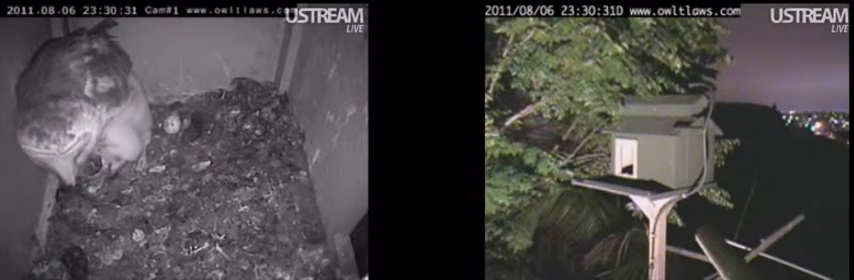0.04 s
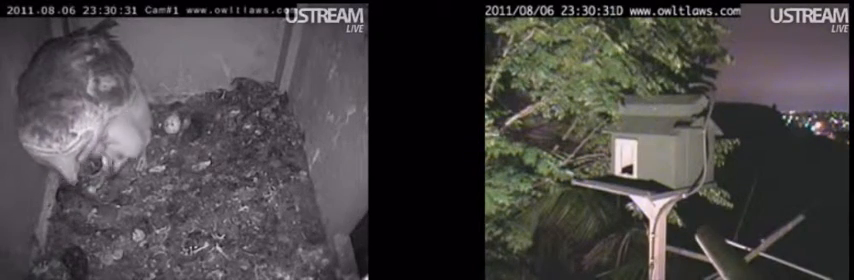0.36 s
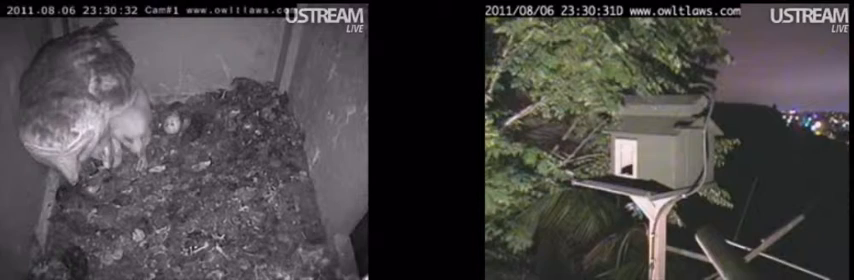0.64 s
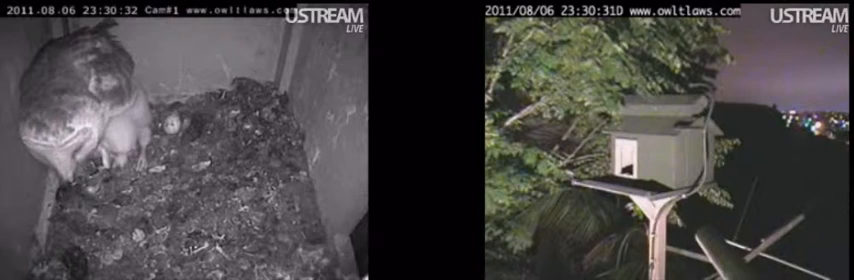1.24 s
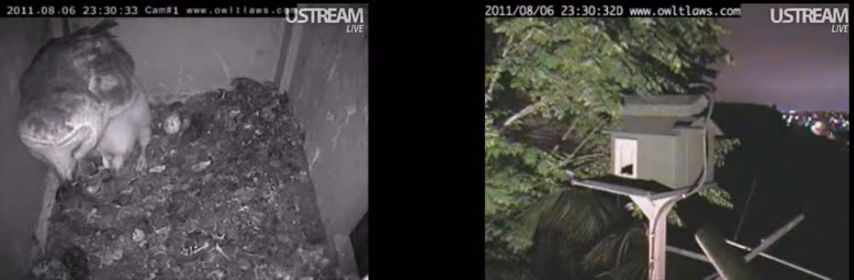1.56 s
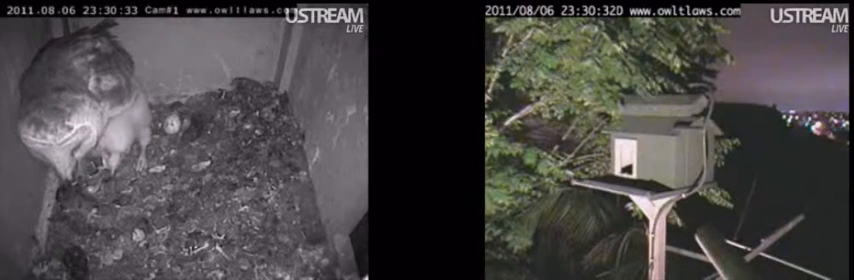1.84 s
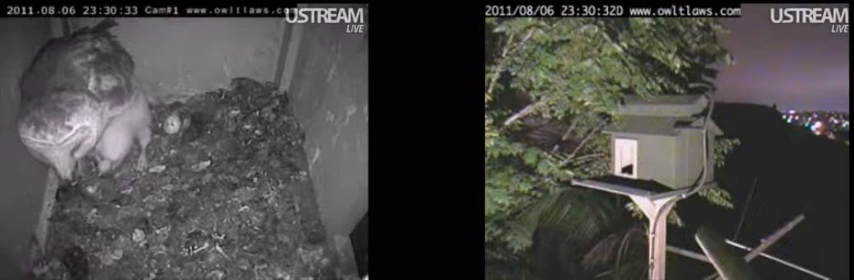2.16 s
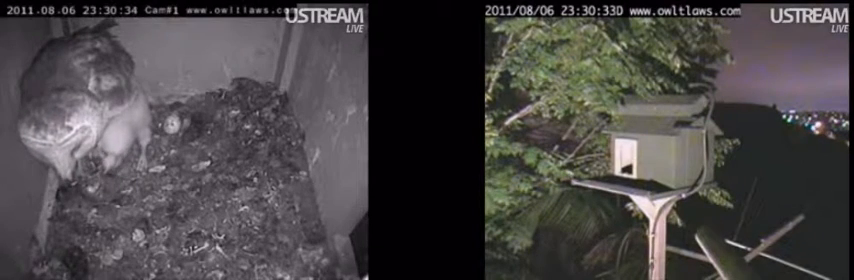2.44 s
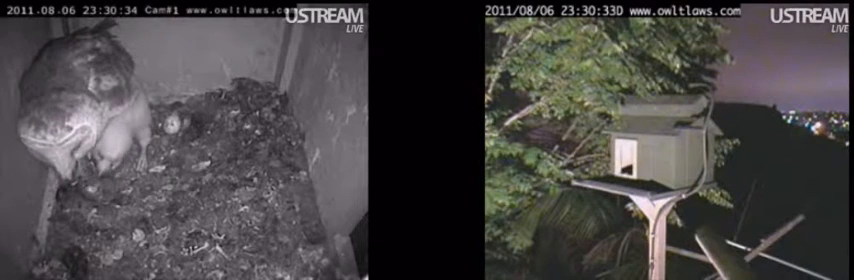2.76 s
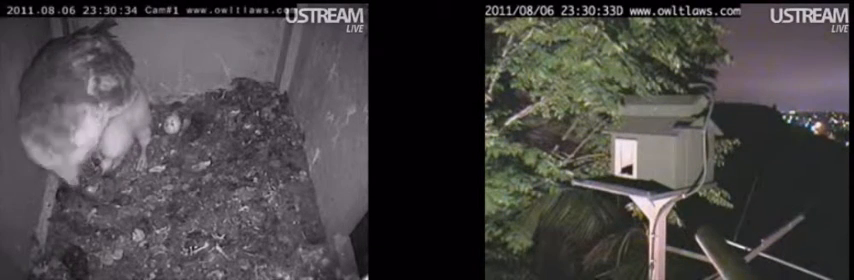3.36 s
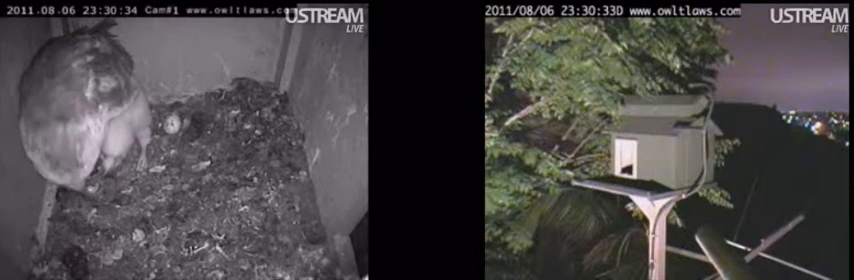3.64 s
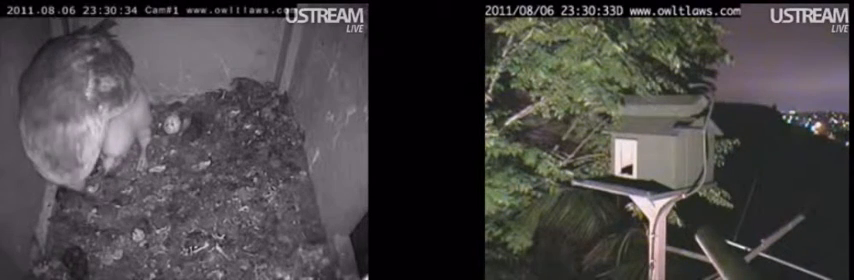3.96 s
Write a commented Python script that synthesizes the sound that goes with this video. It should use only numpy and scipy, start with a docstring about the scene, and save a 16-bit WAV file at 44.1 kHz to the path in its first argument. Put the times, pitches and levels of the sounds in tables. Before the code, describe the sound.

Close to the microphone in a hollow wooden nest box, an owlet makes three short, raspy hissing calls with pauses between. Feathers rustle faintly and a bill or claw ticks, while a distant engine-like hum and rumble continue.

```python
"""Inside a wooden nest box, close to a small camera microphone: a young barn owl begs three times.
Each call is a rush of air that stirs the box, topped by a fluttering rasp near 2.8 kHz that swells,
breaks into a thin whistle and stops short. Nearby, feathers rustle and a bill or claw ticks.
From outside come a low hum like a distant engine and a rumble, with night noise coloured by the box.
The microphone adds a faint hiss and whine. Now and then a faint treble hiss swells briefly."""
import sys
import numpy as np
from scipy import signal
from scipy.fft import rfft, irfft
from scipy.io import wavfile

SR = 44100
rng = np.random.default_rng(int(sys.argv[2]) if len(sys.argv) > 2 else 0)


def pcm_store(signal):
    """Save signal as 16-bit PCM."""
    levels = np.round(np.clip(np.atleast_2d(signal), -1, 1) * 32767)
    wavfile.write(sys.argv[1], SR, levels.astype(np.int16).T)


N = 176400
T = np.arange(N) / SR

# Soft treble of the feathers and the hiss swells. Each row: frequency in Hz, relative level in dB.
TREBLE_SPECTRUM = [(2000, -4.5), (3500, 1), (5500, -2.5), (7500, -5), (8800, -9), (9600, -18.5)]
# Patches of grainy treble. Each row: start and end in seconds, level in dB.
TREBLE_PATCHES = [(-.1, .68, -69), (.01, 0.11, -79), (0.716, 0.928, -74.5), (1.402, 1.48, -77.5),
                  (3.448, 3.57, -73.5), (3.594, 3.71, -72.5), (3.727, 3.799, -69.5), (3.775, 3.905, -74),
                  (3.891, 4.02, -74)]
HISS_PATCH = TREBLE_PATCHES[2]  # here a faint treble hiss swells briefly; the other rows are feathers


def owl():
    """Close up: rushing air stirs the box, puffs of turbulence ring the throat, a whistle breaks in."""
    # One list a call. Each row: time in seconds, rasp, air and whistle levels in dB, whistle in Hz.
    begs = [
        [(.275, -74, -51, -84, 2800), (.295, -51.5, -51, -61, 2720), (.32, -49.5, -48.5, -58, 2920),
         (.35, -61, -52, -66, 2900), (.395, -60, -47.5, -60, 2700), (.425, -60, -45, -68, 2800),
         (.485, -52.5, -47.5, -56, 2750), (.545, -44.5, -50, -56, 2950), (.583, -47, -45, -43, 2800),
         (.596, -40, -59, -54, 2790), (.627, -41.5, -41, -54, 2950), (.639, -47, -45, -42, 2950),
         (.647, -54, -69, -65, 2820), (.662, -62, -69, -56, 2820), (.672, -67, -64, -67, 2780)],
        [(1.821, -72, -59, -74, 2950), (1.831, -67, -48.5, -63.5, 2900), (1.87, -61, -51, -75, 2700),
         (1.95, -53.5, -44, -69.5, 2760), (1.99, -48.5, -46, -53.5, 2920), (2.01, -56.5, -50, -65.5, 2800),
         (2.033, -48.5, -45, -59, 2680), (2.057, -44, -44, -48.5, 2670), (2.075, -48.5, -46, -47, 2680),
         (2.092, -48.5, -56, -61, 2820), (2.109, -39, -47, -47.5, 2700), (2.128, -44, -50, -53, 2720),
         (2.146, -45.5, -47, -58, 3000), (2.172, -52, -48, -50, 2860), (2.186, -53, -52.5, -61, 2910),
         (2.199, -60, -71, -57.5, 3030), (2.208, -71, -71, -69, 3080)],
        [(2.975, -75, -57, -74, 2780), (3.005, -61.5, -47.5, -58, 2820), (3.035, -58.5, -50, -54, 2840),
         (3.08, -53.5, -48.5, -53.5, 2850), (3.115, -54, -55, -53, 2740), (3.135, -54, -50, -52, 2860),
         (3.155, -52, -49, -69, 2820), (3.175, -55, -48, -61, 2800), (3.19, -51, -47.5, -47.5, 2770),
         (3.215, -50, -49, -52, 2690), (3.26, -51, -46, -54, 2670), (3.283, -53, -46.5, -53, 2850),
         (3.31, -55.5, -63, -55, 2750), (3.337, -60, -49, -67, 2930), (3.35, -72, -82, -75, 2900)],
    ]
    # Resonances of the throat. Each row: frequency in Hz, relative level in dB.
    throat_spectrum = [(1000, -20.5), (1600, -17.5), (2000, -12), (2350, -6), (2530, 2), (2700, 1),
                       (2970, 0), (3140, -12.5), (3500, -16), (3750, -26), (4050, -38), (4600, -56.5),
                       (9000, -64)]
    # The breath as the box colours it. Each row: frequency in Hz, relative level in dB.
    air_spectrum = [(150, -26.5), (300, -3.5), (480, -10), (620, -5.5), (770, 7.5), (930, 0), (1110, -22.5),
                    (1220, -11), (1500, -21.5), (2100, -16), (3000, -46.5), (4000, -53), (9000, -70)]
    rows = np.concatenate(begs)
    rasp_db, air_db, whistle_db, whistle_hz = (curve(rows[:, [0, k]]) for k in range(1, 5))
    fade_s = .016
    calling = sum(stretch(beg[0][0] - fade_s / 2, beg[-1][0] + fade_s / 2, fade_s) for beg in begs)
    puffs = flutter()
    throat = colour(puffs * noise(), throat_spectrum)
    breathy_ring = amp(-7.5) * resonate(puffs * noise(), whistle_hz, width_hz=180)
    rasp = amp(rasp_db) * unit(throat + breathy_ring)
    air = amp(air_db) * colour(noise(), air_spectrum)
    call = rasp + air + amp(whistle_db) * whistle(whistle_hz)
    return calling * call + bill_closings()


def flutter():
    """Uneven puffs of the syrinx, each with its own strength; rms 1."""
    rate_hz, jitter, depth, spread_db = 154.6, .3, .42, 1.8
    turns = np.cumsum(rate_hz * np.exp(jitter * wander(88.6))) / SR
    strength = amp(spread_db * np.clip(noise(), -2, 2))[turns.astype(int)]
    return unit(1 - depth + 2 * depth * strength * np.sin(np.pi * turns) ** 4)


def whistle(hz):
    """A thin, unsteady tone of air through the syrinx; rms 1."""
    jitter_hz, shimmer_db = 50, 2.5
    turns = np.cumsum(hz + jitter_hz * wander(140)) / SR
    return unit(np.sin(2 * np.pi * turns) * amp(shimmer_db * wander(120)))


def bill_closings():
    """As the bill closes on each call, air rings a lower, sliding resonance of the mouth."""
    # Each row: centre and half-length in seconds, level in dB, pitch in Hz, slide in Hz per second.
    closings = [(0.645, 0.02, -51.5, 2240, -20000), (2.157, .013, -52.5, 2020, 16000),
                (3.33, 0.02, -62, 1690, -15000)]
    out = np.zeros(N)
    for centre, half_length, db, hz, slide in closings:
        glide_hz = hz + slide * np.clip(T - centre, -2 * half_length, 2 * half_length)
        out += amp(db) * swell(centre, half_length) * resonate(noise(), glide_hz, width_hz=360)
    return out


def ticks():
    """Tiny dry clicks of bill or claw in the nest, each a fast-dying burst of noise."""
    # Each row: start in seconds, peak level in dB.
    clicks = [(0.349, -48), (0.535, -44), (.638, -58), (1.42, -46.5)]
    # Colour of a click. Each row: frequency in Hz, relative level in dB.
    click_spectrum = [(600, -16), (1300, 5), (1950, 5.5), (2400, -5.5), (3000, -9), (4600, -9.5),
                      (5500, -33), (9500, -49)]
    t60_s = .013
    t = np.arange(2048) / SR - .005
    decay = (t > 0) * 1000 ** (-abs(t) / t60_s)
    out = np.zeros(N)
    for start, db in clicks:
        tick = colour(rng.standard_normal(len(t)) * decay, click_spectrum)
        out += amp(db) * np.interp(T - start, t, tick / abs(tick).max(), 0, 0)
    return out


def feathers():
    """Feathers rustle and scuff as the owls shift."""
    return grainy_treble([row for row in TREBLE_PATCHES if row != HISS_PATCH])


def distant_hum():
    """Far outside the box, one low wavering tone like an engine."""
    # Course of the pitch. Each row: time in seconds, frequency in Hz.
    pitches = [(0, 71.54), (.85, 77.43), (1.1, 73.12), (3.3, 72.5), (4, 78.87)]
    # Swells and dips. Each row: time in seconds, level in dB before the trim.
    levels = [(0.0, -67), (0.04, -34), (0.37, -37.5), (0.39, -43), (0.43, -37.5), (0.83, -43),
              (0.91, -29.5), (1.19, -24), (1.32, -41.5), (1.36, -28), (1.67, -30), (1.71, -56), (1.77, -30),
              (2.57, -29.5), (2.62, -43), (2.68, -31), (2.8, -37), (2.85, -26.5), (3.02, -34.5),
              (3.05, -38), (3.16, -31.5), (3.29, -38.5), (3.44, -25.5), (3.5, -67), (3.55, -32),
              (3.64, -39.5), (3.75, -32), (3.83, -47), (3.85, -31.5), (4.0, -41)]
    pitch_drift, trim_db, waver_db = .0096, -2.5, 1
    hz = curve(pitches) * (1 + pitch_drift * wander(5.3))
    tone = unit(np.sin(2 * np.pi * np.cumsum(hz) / SR))
    return tone * amp(curve(levels) + trim_db + waver_db * wander(23))


def outdoor_rumble():
    """Deep noise from outdoors, slowly easing off."""
    # Each row: time in seconds, level in dB.
    levels = [(0, -35), (.8, -37), (1.1, -35.5), (2, -38), (3, -40), (4, -41.5)]
    # Its colour. Each row: frequency in Hz, relative level in dB.
    spectrum = [(8, -27.5), (25, -13.5), (40, -4.5), (58, -4), (68, 1), (80, -1.5), (92, -4.5), (108, -15),
                (135, -31), (200, -29.5)]
    return amp(curve(levels)) * colour(noise(), spectrum)


def hollow_box():
    """Night noise from outside rings in the hollow box around the microphone."""
    # Resonances of the box. Each row: frequency in Hz, relative level in dB.
    spectrum = [(70, -23), (120, -1.5), (190, -6), (240, -1.5), (280, 3.5), (350, -3.5), (430, -13.5),
                (540, -15), (680, -11.5), (760, -3.5), (812, 3), (865, -9), (920, -2), (1020, -11),
                (1130, -20), (1500, -23.5), (2200, -27.5), (2750, -22.5), (3100, -28), (3700, -41),
                (5000, -64)]
    level_db, waver_db = -49, .5
    return amp(level_db + waver_db * wander(5.7)) * colour(noise(), spectrum)


def microphone_noise():
    """The microphone's own steady hiss and thin electrical whine."""
    # Each row: frequency in Hz, level in dB.
    whine_tones = [(7927, -90), (8072, -93)]
    # Each row: frequency in Hz, relative level in dB.
    hiss_spectrum = [(1500, 10), (3500, 21), (5000, -9), (7500, -13), (8700, -15), (9600, -23.5)]
    whine = sum(amp(db) * resonate(noise(), hz, width_hz=12) for hz, db in whine_tones)
    return whine + amp(-81) * colour(noise(), hiss_spectrum)


def hiss_swells():
    """Now and then a faint treble hiss swells briefly."""
    # Each row: centre and half-length in seconds, level in dB.
    swells = [(1.297, 0.034, -75), (1.723, 0.043, -74.5), (2.002, 0.028, -75.5), (2.57, 0.069, -79),
              (2.759, .06, -72.5), (3.065, 0.034, -71.5), (3.28, 0.054, -72)]
    level = sum(amp(db) * swell(centre, half_length) for centre, half_length, db in swells)
    return level * colour(noise(), TREBLE_SPECTRUM) + grainy_treble([HISS_PATCH])


def grainy_treble(patches):
    """Patches of soft treble noise with sparse crackles in it."""
    crackles_per_s, waver_db = 540, 1
    level = sum(amp(db) * stretch(start, end, fade_s=.022) for start, end, db in patches)
    crackles = unit(noise() * (rng.random(N) < crackles_per_s / SR))
    return level * amp(waver_db * wander(15)) * colour(noise() + amp(-7) * crackles, TREBLE_SPECTRUM)


def amp(db):
    """Decibels to gain."""
    return 10 ** (np.asarray(db) / 20)


def unit(x):
    """Scales to rms 1."""
    return x / np.sqrt(np.mean(x ** 2) + 1e-20)


def noise():
    """White noise."""
    return rng.standard_normal(N)


def wander(rate_hz):
    """Random drift up to about the given rate; rms 1."""
    hz = np.fft.rfftfreq(N, 1 / SR)
    return unit(irfft(rfft(noise()) / (1 + (hz / rate_hz) ** 4), N))


def curve(points):
    """Joins (seconds, value) points by straight lines."""
    return np.interp(T, *np.transpose(points))


def swell(centre, half_length):
    """A bell-shaped rise and fall around a moment."""
    return np.exp(-((T - centre) / half_length) ** 2)


def stretch(start, end, fade_s):
    """Fades in after start and out before end."""
    return np.clip(np.minimum(T - start, end - T) / fade_s, 0, 1)


def colour(x, spectrum):
    """Filters by a (Hz, dB) spectrum, rolling off beyond its top; rms 1."""
    hz = np.fft.rfftfreq(len(x), 1 / SR) + 1
    points_hz, points_db = np.transpose(spectrum)
    gain = amp(np.interp(np.log(hz), np.log(points_hz), points_db))
    rolloff = np.minimum(points_hz[-1] / hz, 1) ** 2
    return unit(irfft(rfft(x) * gain * rolloff, len(x)))


def resonate(x, hz, width_hz):
    """A steep resonance that can follow a pitch curve; rms 1."""
    carrier = np.exp(2j * np.pi * np.cumsum(hz * np.ones(N)) / SR)
    pole = np.exp(-np.pi * width_hz / SR)
    baseband = signal.lfilter([(1 - pole) ** 2], [1, -2 * pole, pole * pole], x / carrier)
    return unit((carrier * baseband).real)


def scene():
    """The nest and the night outside, at the one microphone in the box."""
    nest = owl() + ticks() + feathers()
    outside = distant_hum() + outdoor_rumble() + hollow_box()
    return (nest + outside + microphone_noise() + hiss_swells())[None]


def record(dry):
    """The small camera passes nothing much above 9.7 kHz."""
    lowpass = signal.firwin(511, 9700, window=("kaiser", 9), fs=SR)
    return signal.oaconvolve(dry, lowpass[None], "same")


dry = scene()
out = record(dry)
pcm_store(out)
```